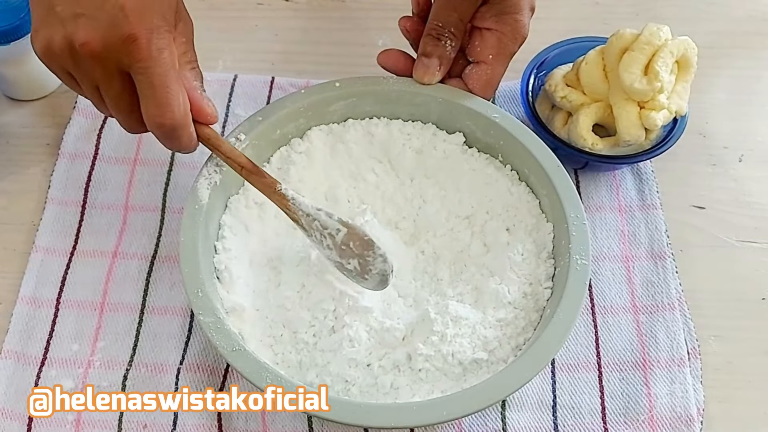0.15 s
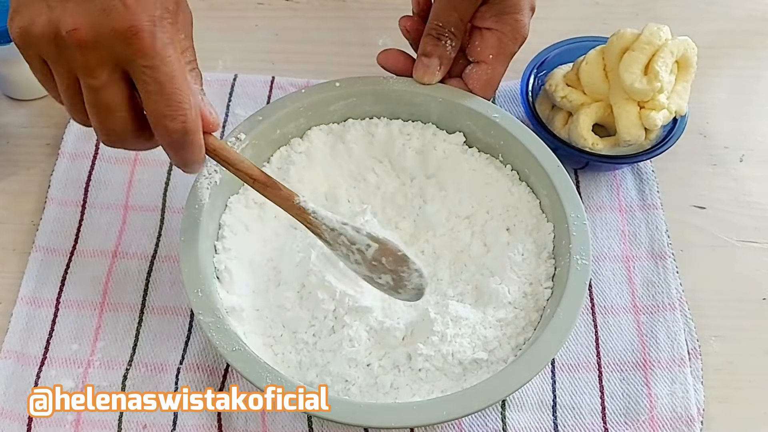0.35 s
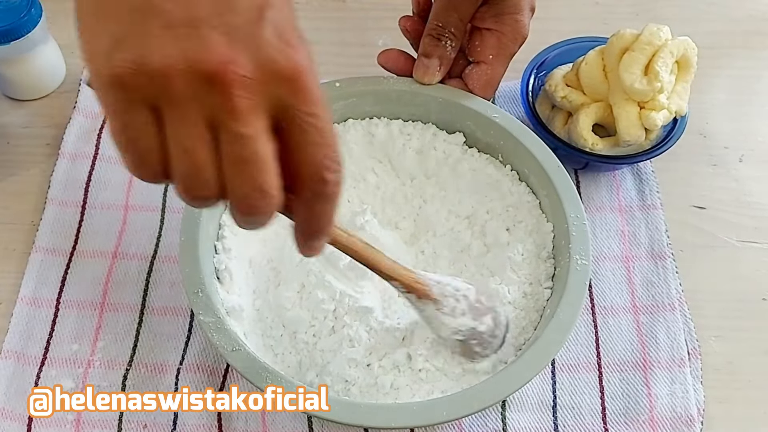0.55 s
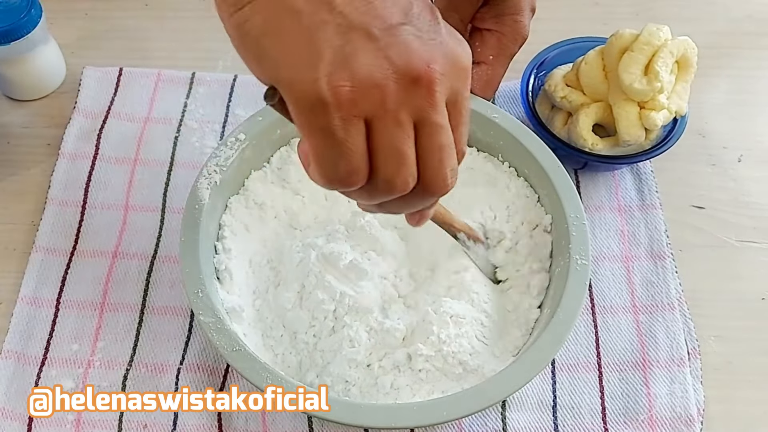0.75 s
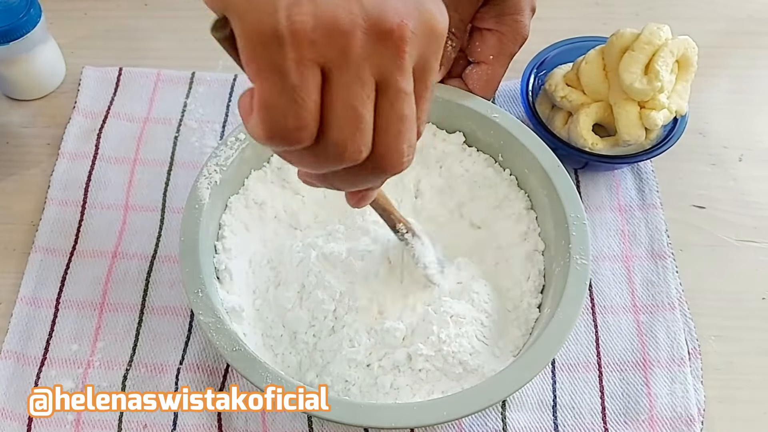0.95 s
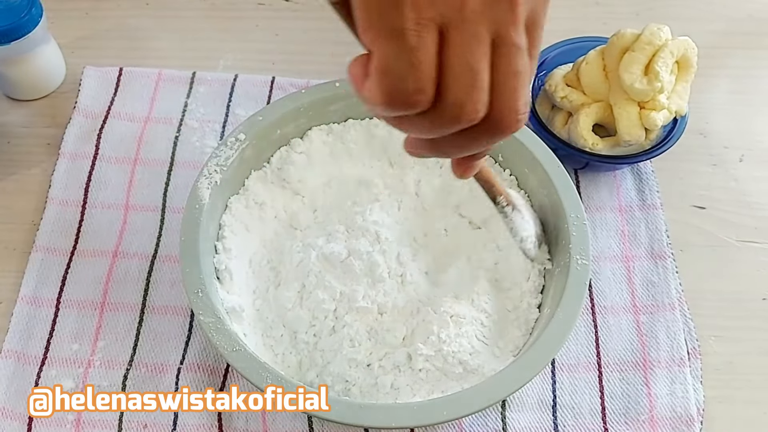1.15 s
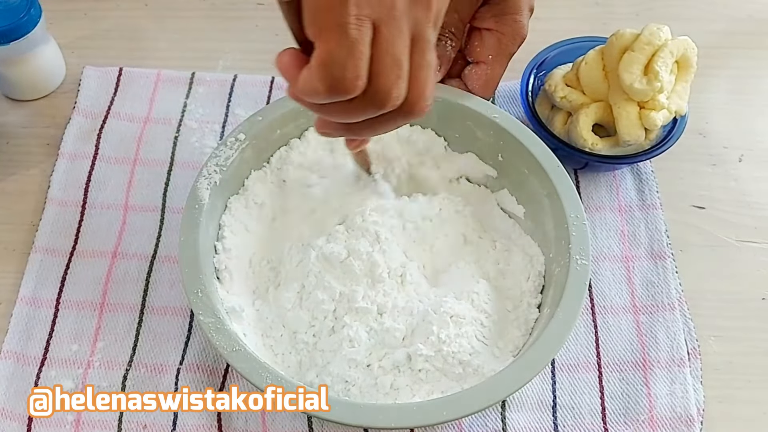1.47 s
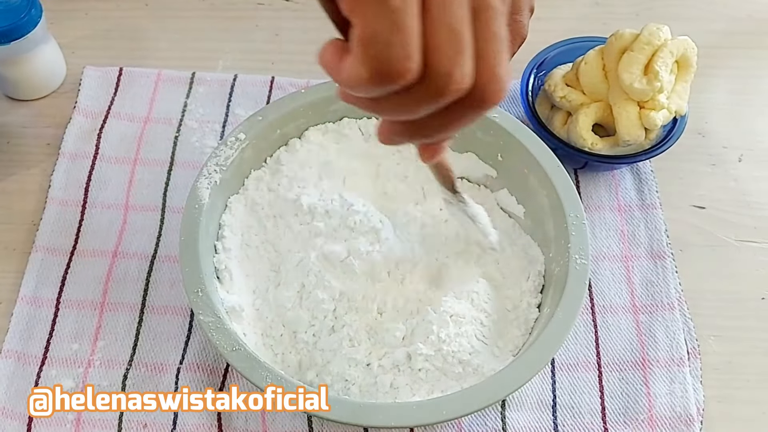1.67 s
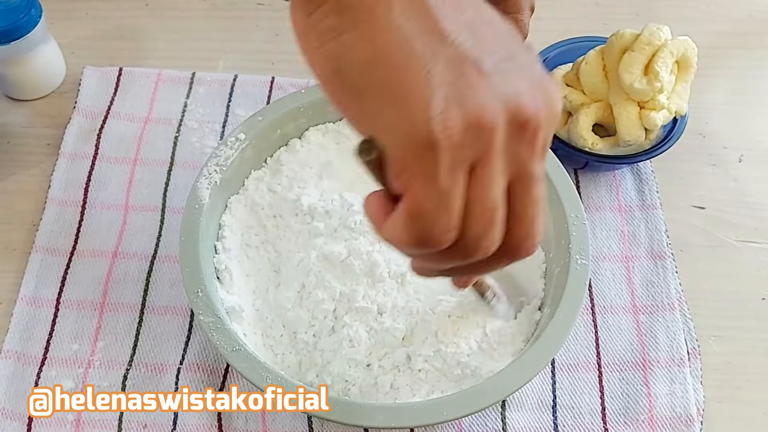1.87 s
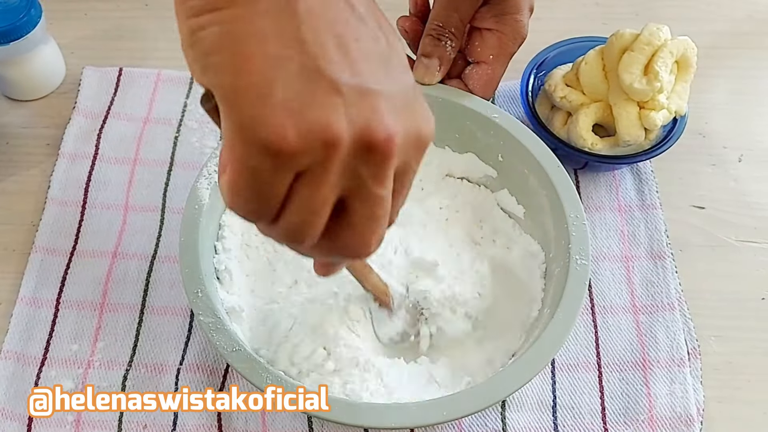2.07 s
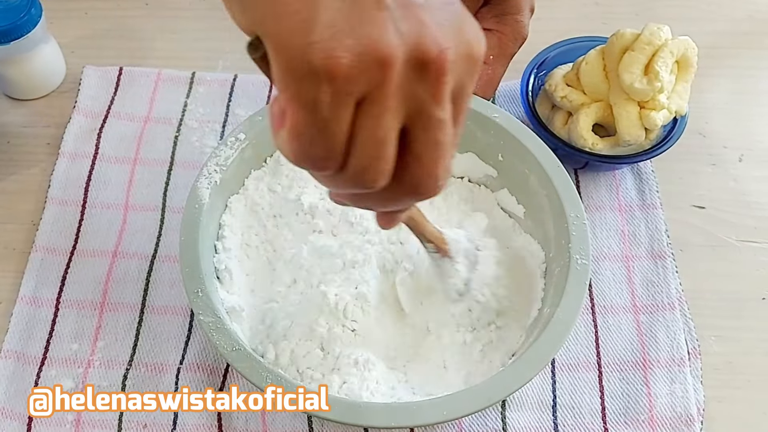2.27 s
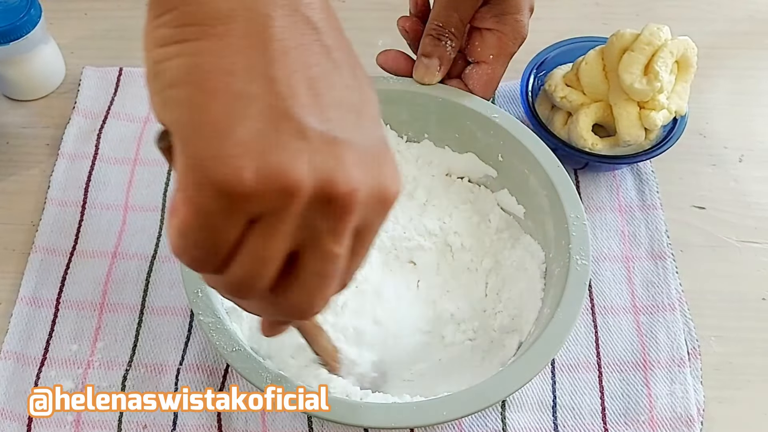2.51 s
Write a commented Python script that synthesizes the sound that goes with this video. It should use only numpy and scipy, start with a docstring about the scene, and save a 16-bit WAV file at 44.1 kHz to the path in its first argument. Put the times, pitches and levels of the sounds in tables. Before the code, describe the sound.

Spoon stirring flour and sugar in a plastic bowl: two hard knocks, then gritty crunching strokes and ticks

```python
"""A wooden spoon stirs flour and sugar in a plastic bowl on a cloth-covered table, close to a phone: random
grain clicks, coloured as hiss, crunch and dull rub, follow each stroke. Knocks ring decaying modes of bowl and
table; ticks of the spoon on the wall are short noise bursts. A small kitchen echoes it all with decaying noise,
over an appliance hum, rumble and faint hiss; brief narrow swishes and whistles come and go, some a woody ring
of bowl or spoon during the rubs."""
import sys
import numpy as np
from scipy import signal
from scipy.fft import rfft, irfft
from scipy.io import wavfile

SR = 44100
rng = np.random.default_rng(int(sys.argv[2]) if len(sys.argv) > 2 else 0)


def dump_mix(stems):
    """Bounce the given channels to the path in sys.argv[1] as a 16-bit WAV at rate SR."""
    frames = np.atleast_2d(stems).T  # one column per channel
    limited = np.clip(frames, -1, 1)  # hard clip at full scale
    pcm = np.round(limited * 32767).astype(np.int16)
    wavfile.write(sys.argv[1], SR, pcm)


def amplitude_ratio(level_db):
    """Convert a level in decibels to the matching linear amplitude (field) ratio."""
    exponent = np.asarray(level_db, float) / 20
    return 10 ** exponent


N = 116865
LEAD = 4096  # samples computed ahead of the start
TOTAL = N + LEAD
ALIKE_BELOW_HZ = 500
STIR_PAN_DB = 2  # left over right


def table(rows, hz):
    """Value of (hz, value) rows on a log-frequency axis."""
    row_hz, value = np.array(rows).T
    return np.interp(np.log(np.maximum(hz, 1)), np.log(row_hz), value)


def colour(x, spectrum):
    """Filters x by a spectrum in dB, to rms 1."""
    gain = amplitude_ratio(table(spectrum, np.fft.rfftfreq(x.shape[-1], 1 / SR)))
    y = irfft(rfft(x) * gain, x.shape[-1])
    return y / np.sqrt(np.mean(y ** 2))


def highpass(x, order, cut_hz):
    """Butterworth high-pass."""
    return signal.sosfilt(signal.butter(order, cut_hz, "high", fs=SR, output="sos"), x)


def pair(mid, side):
    """Left and right: alike in the bass, differing in the treble by the side signal."""
    return mid + highpass(side, 1, ALIKE_BELOW_HZ) * np.array([[1], [-1]])


def pan(x, left_over_right_db):
    """Places x left or right by level."""
    half_db = left_over_right_db / 2
    return x * amplitude_ratio(np.array([[half_db], [-half_db]]))


def add(out, start_s, x):
    """Mixes x in at start_s."""
    i = int(start_s * SR) + LEAD
    out[:, i:i + x.shape[1]] += x[:, :out.shape[1] - i]


def band(hz, width_hz):
    """Noise in a narrow Gaussian band, rms 1; its level wavers."""
    f = np.fft.rfftfreq(TOTAL, 1 / SR)
    y = irfft(rfft(rng.standard_normal(TOTAL)) * np.exp(-((f - hz) / width_hz) ** 2), TOTAL)
    return y / y.std()


# background hiss spectrum [hz, relative_db_per_hz]
FLOOR_SPECTRUM = [(12, -39), (20, -20.5), (77, -2), (230, -9.5), (372, -14.5), (452, -11.5), (939, -27.5),
                  (1510, -29.5), (2060, -28.5), (3830, -34), (4930, -27.5), (10500, -37), (13900, -35.5),
                  (15200, -34.5), (16500, -61.5)]
FLOOR_DB = -60
# low rumble level [time_s, level_db]
RUMBLE_LEVEL = [(0.3, -56), (0.33, -64), (0.37, -49.5), (0.4, -66.5), (0.77, -68.5), (0.82, -59.5),
                (0.95, -66.5), (1.02, -53), (1.16, -87), (1.27, -52), (1.45, -51.5), (1.6, -70),
                (1.62, -58), (2.34, -60.5), (2.37, -52.5), (2.65, -74)]
RUMBLE_HZ, RUMBLE_WIDTH_HZ = 64, 24
# wavering hum bands [centre_hz, width_hz, level_db]
HUM_BANDS = [(150, 25, -66), (378, 20, -70)]
# brief narrow swishes and whistles, those near 1.3-1.5 kHz a woody ring of bowl or spoon during the rubs
# [start_s, length_s, centre_hz, width_hz, level_db]
SWISHES = [(.94, .09, 2600, 120, -73), (.94, .07, 3600, 120, -72), (1.07, .1, 8350, 70, -65),
           (1.14, .08, 2050, 250, -64), (1.84, .14, 1600, 300, -59), (1.97, .2, 4500, 450, -64),
           (2.05, .05, 1330, 200, -54), (2.34, .1, 2050, 350, -72), (2.47, .06, 1450, 250, -51),
           (2.58, .11, 1350, 250, -53)]


def background():
    """Steady coloured noise, narrow-band rumble that comes and goes, hum, and brief swishes, some a woody ring
    of bowl or spoon during the rubs."""
    t = (np.arange(TOTAL) - LEAD) / SR
    out = colour(pair(*rng.standard_normal((2, TOTAL))), FLOOR_SPECTRUM) * amplitude_ratio(FLOOR_DB)
    rumble_time_s, rumble_db = np.array(RUMBLE_LEVEL).T
    out += band(RUMBLE_HZ, RUMBLE_WIDTH_HZ) * amplitude_ratio(np.interp(t, rumble_time_s, rumble_db))
    for hz, width_hz, level_db in HUM_BANDS:
        out += band(hz, width_hz) * amplitude_ratio(level_db)
    for start_s, length_s, hz, width_hz, level_db in SWISHES:
        swell = np.sin(np.pi * np.clip((t - start_s) / length_s, 0, 1))
        out += pair(band(hz, width_hz), 0.64 * band(hz, width_hz)) * swell * amplitude_ratio(level_db)
    return out


# knocks; the first falls just before the start [start_s, level_db, push_ms, left_over_right_db]
KNOCKS = [(-.031, 7.5, 0.33, -1.5), (.1113, 0.5, 0.67, 3), (0.622, -33, 3.07, 2), (.808, -31.5, 4.6, 2),
          (.845, -34.5, 0.76, 2), (0.854, -36, 4.1, 3), (0.867, -36.5, 0.78, 2.5), (1.23, -35, 3.16, 0.5),
          (2.074, -42, 6, 3), (1.345, -45, 3.6, 3), (1.4, -37.5, 1.6, -2), (2.496, -38.5, 1.63, -7.5),
          (2.525, -42, 3.3, 1)]
# modes of bowl and table [mode_hz, relative_db, t60_s]
BODY_MODES = [(79.4, -20, .2), (163.8, -9, 0.13), (241.8, 0, 0.059), (364.6, -9.5, .1), (398.5, -6, 0.11),
              (486, 10.5, 0.018), (615, -21, 0.084), (867, 0, 0.025), (955, -19.5, 0.065), (1180, 8, 0.013),
              (1350, -2.5, 0.017), (1480, -11.5, 0.026)]
# slap noise spectrum [hz, relative_db_per_hz]
SLAP_SPECTRUM = [(300, -19.5), (800, -3), (1500, 0), (2400, -1), (3500, -5.5), (5000, -10.5), (8000, -14),
                 (16000, -29.5)]
SLAP_DB, SLAP_T60_S = -17.5, 0.012
KNOCK_RISE_S, KNOCK_LOW_CUT_HZ = 0.00045, 110


def knocks():
    """A sine-squared push rings the modes of bowl and table; a slap of noise fades with longer pushes."""
    out = np.zeros((2, TOTAL))
    t = np.arange(SR // 3) / SR
    ring = sum(amplitude_ratio(db - 60 * t / t60_s) * np.cos(2 * np.pi * hz * t) for hz, db, t60_s in BODY_MODES)
    ring = ring * (1 - np.exp(-t / KNOCK_RISE_S))
    ring = highpass(ring / abs(ring).max(), 2, KNOCK_LOW_CUT_HZ)
    slap = colour(rng.standard_normal(len(t)), SLAP_SPECTRUM) * amplitude_ratio(SLAP_DB - 60 * t / SLAP_T60_S)
    for start_s, level_db, push_ms, left_over_right_db in KNOCKS:
        push = np.sin(np.pi * np.clip(t[:256] * 1000 / push_ms, 0, 1)) ** 2
        blow = np.convolve(ring, push)[:len(t)]
        knock = blow / abs(blow).max() + slap / (1 + push_ms ** 2)
        add(out, start_s, pan(knock * amplitude_ratio(level_db), left_over_right_db))
    return out


# echo decay [hz, t60_s]
ROOM_DECAY = [(60, 0.17), (150, 0.24), (400, 0.29), (1000, 0.36), (2500, 0.24), (6000, 0.13),
              (16000, 0.072)]
# echo colour [hz, gain_db]
ROOM_TONE = [(60, 12), (250, -4.5), (1000, -7), (3000, 6), (8000, -0.5), (16000, -11)]
ROOM_ONSET_S = 0.018


def room(x):
    """Kitchen echo: noise that builds up, then dies octave band by octave band."""
    t = np.arange(SR // 2) / SR
    noise = rfft(pair(*rng.standard_normal((2, len(t)))))
    octave = np.log2(np.fft.rfftfreq(len(t), 1 / SR) + 1)
    response = np.zeros((2, len(t)))
    for hz in 2. ** np.arange(5, 15):
        weight = np.clip(1 - abs(octave - np.log2(hz)), 0, 1)
        decay_db = table(ROOM_TONE, hz) - 60 * t / table(ROOM_DECAY, hz)
        response += irfft(noise * weight, len(t)) * amplitude_ratio(decay_db)
    response = response * (1 - np.exp(-t / ROOM_ONSET_S)) / np.sqrt(SR / 20)
    return signal.fftconvolve(x.mean(0, keepdims=True), response, axes=1)[:, :TOTAL]


def grains(rate_per_s, scatter_db):
    """Random clicks of either sign with a long tail of sizes."""
    when, sign, size = rng.random((3, TOTAL))
    return (when < rate_per_s / SR) * np.sign(sign - .5) * amplitude_ratio(-scatter_db * np.log(size + 1e-4))


# strokes through the powder, one list each [time_s, hiss_db, crunch_db, rub_db]
STROKES = [
    [(.17, -66, -62, -48), (.22, -62, -52, -47), (.27, -59, -52.5, -40), (.34, -65, -55, -51),
     (.4, -64.5, -65, -57), (.48, -79.5, -86, -64), (.545, -94, -94, -72.5)],
    [(.56, -58.5, -59, -57.5), (.61, -49, -44, -59), (.617, -73, -54, -51.5), (.624, -41, -40, -45.5),
     (.65, -47, -34.5, -41.5), (.674, -42, -35.5, -45.5), (.686, -83, -53, -45.5), (.698, -31, -47, -50.5),
     (.704, -40, -40, -40.5), (.74, -53, -46, -44), (.79, -58, -54, -43.5), (.85, -69.5, -56, -53),
     (.9, -69.5, -72.5, -70), (.97, -70.5, -76, -78)],
    [(1.1, -74.5, -86.5, -80.5), (1.17, -65, -69.5, -70), (1.208, -62, -57.5, -55),
     (1.214, -39, -38.5, -42), (1.24, -43, -38, -38), (1.27, -52, -43.5, -43.5), (1.285, -47.5, -48, -41.5),
     (1.32, -54, -51.5, -47), (1.34, -48.5, -42.5, -40.5), (1.38, -58.5, -53, -47.5),
     (1.41, -59, -59.5, -53), (1.45, -71, -75, -81), (1.55, -83, -101, -75.5)],
    [(1.63, -74, -75, -78), (1.655, -52, -62, -61.5), (1.71, -53, -53, -50), (1.76, -60.5, -65, -60),
     (1.82, -71, -77.5, -65), (1.835, -79, -62, -59), (1.9, -61, -54, -55), (1.95, -59, -57.5, -52.5),
     (1.99, -81, -60.5, -65), (2.045, -75, -63, -71.5), (2.065, -56, -50.5, -52), (2.1, -69, -64, -59),
     (2.2, -85, -91, -82.5)],
    [(2.3, -73.5, -77, -87.5), (2.42, -64, -72.5, -71), (2.435, -55.5, -56.5, -59),
     (2.46, -52, -49.5, -56.5), (2.49, -75.5, -47, -47.5), (2.52, -44.5, -37.5, -40.5),
     (2.555, -61, -53.5, -52.5), (2.59, -67, -59.5, -63), (2.6, -54.5, -49, -49.5), (2.65, -73, -51, -52.5)],
]
# sugar hiss spectrum [hz, relative_db_per_hz]
HISS_SPECTRUM = [(4500, -25), (6000, -3.5), (8000, 5), (9000, 0), (14000, -1.5), (15800, -22), (16600, -31)]
# sugar crunch spectrum [hz, relative_db_per_hz]
CRUNCH_SPECTRUM = [(1800, -26.5), (2600, 0), (3500, -2.5), (4500, -3), (6000, -7.5), (8000, -18)]
# dull rub spectrum [hz, relative_db_per_hz]
RUB_SPECTRUM = [(120, -36), (220, -9), (330, -4), (700, -6), (1200, -4.5), (1700, -4.5), (2600, -12),
                (3800, -33.5)]
GRAINS_PER_S, GRAIN_SCATTER_DB = 6000, 2.4
RUBS_PER_S, RUB_SCATTER_DB = 1500, 2.6


def stirring():
    """Sugar grains hiss and crunch and the spoon rubs through the flour, all following the stroke."""
    t = (np.arange(TOTAL) - LEAD) / SR
    time_s, *levels_db = np.concatenate(STROKES).T
    hiss_db, crunch_db, rub_db = (np.interp(t, time_s, db) for db in levels_db)
    sugar = pair(grains(GRAINS_PER_S, GRAIN_SCATTER_DB), 1.1 * grains(GRAINS_PER_S, GRAIN_SCATTER_DB))
    flour = pair(grains(RUBS_PER_S, RUB_SCATTER_DB), 0.85 * grains(RUBS_PER_S, RUB_SCATTER_DB))
    mix = colour(sugar, HISS_SPECTRUM) * amplitude_ratio(hiss_db)
    mix += colour(sugar, CRUNCH_SPECTRUM) * amplitude_ratio(crunch_db)
    mix += colour(flour, RUB_SPECTRUM) * amplitude_ratio(rub_db)
    fade_in = amplitude_ratio(-300 * np.clip(time_s[0] - t, 0, 1))  # 300 dB/s up to the first stroke
    return pan(mix * fade_in, STIR_PAN_DB)


# spoon on the wall; crack and wood relative to the tick [start_s, level_db, pitch_hz, crack_db, wood_db]
TICKS = [(.6178, -11.5, 2310, 5.5, -21), (.6514, -23.5, 3300, -12, -20), (.6986, -11.5, 2180, -1.5, -23.5),
         (1.2117, -26.5, 3070, -5, -4.5), (1.2183, -32.5, 1260, -11, -1), (1.2297, -21, 3030, -14, -4.5),
         (1.2487, -32.5, 1180, -13, -0.5), (1.2578, -28, 3000, -12.5, 2.5), (1.2754, -12, 2500, -8.5, -10),
         (1.3187, -34.5, 1250, -13.5, 4), (1.3355, -35, 1700, -3.5, 7.5), (1.3957, -40, 1180, -16, 12),
         (1.828, -41.5, 1960, -10, -11), (1.9155, -27.5, 1600, -11.5, -27),
         (1.9455, -38, 1660, -12.5, -10.5), (2.062, -47.5, 1350, -11.5, -21),
         (2.431, -41.5, 1310, -3, -17.5), (2.4708, -31, 1580, -14, -27), (2.4957, -26, 1480, -13, -10),
         (2.5084, -25.5, 2950, -9, -21), (2.5234, -27, 2900, -9.5, -28), (2.595, -30, 1480, -7.5, -9)]
TICK_RISE_S, TICK_T60_S, CRACK_T60_S, WOOD_T60_S = .0004, .012, .009, .012
TICK_OCTAVES, WOOD_HZ = 0.88, 830


def ticks():
    """A noise burst round each tick's pitch, a bright crack and the spoon's woody note, all dying fast."""
    out = np.zeros((2, TOTAL))
    t = np.arange(2048) / SR
    rise = 1 - np.exp(-(t / TICK_RISE_S) ** 2)
    for start_s, level_db, pitch_hz, crack_db, wood_db in TICKS:
        noise = rng.standard_normal((4, len(t)))
        edges_hz = pitch_hz * 2 ** (TICK_OCTAVES * np.array([-.4, 1]))
        bandpass = signal.butter(2, edges_hz, "band", fs=SR, output="sos")
        burst = pair(noise[0], .5 * noise[1]) * rise * amplitude_ratio(-60 * t / TICK_T60_S)
        wall = signal.sosfilt(bandpass, burst)
        bright = np.diff(noise[2:], prepend=0) / 2
        crack = bright * rise * amplitude_ratio(crack_db - 60 * t / CRACK_T60_S)
        wood_hz = WOOD_HZ * np.exp(0.2 * rng.standard_normal())
        wood = np.sin(2 * np.pi * wood_hz * t) * amplitude_ratio(wood_db - 60 * t / WOOD_T60_S)
        tick = pan(wall / abs(wall).max() + crack + wood, STIR_PAN_DB)
        add(out, start_s, tick * amplitude_ratio(level_db))
    return out


KNOCK_ROOM_DB, STIR_ROOM_DB = 1, 0.5  # sends to the echo


def scene():
    """All sources and their echo over the background."""
    hits = knocks()
    stir = stirring() + ticks()
    echo = room(hits * amplitude_ratio(KNOCK_ROOM_DB) + stir * amplitude_ratio(STIR_ROOM_DB))
    return (hits + stir + echo + background())[:, LEAD:]


def top_cut(x):
    """Nothing passes above the cut-off."""
    return signal.sosfilt(signal.butter(12, 16660, fs=SR, output="sos"), x)


def record(dry):
    """The phone clips at full scale."""
    clipped = np.clip(dry, -1, 1)
    return top_cut(clipped)


dry = scene()
out = record(dry)
dump_mix(out)
```